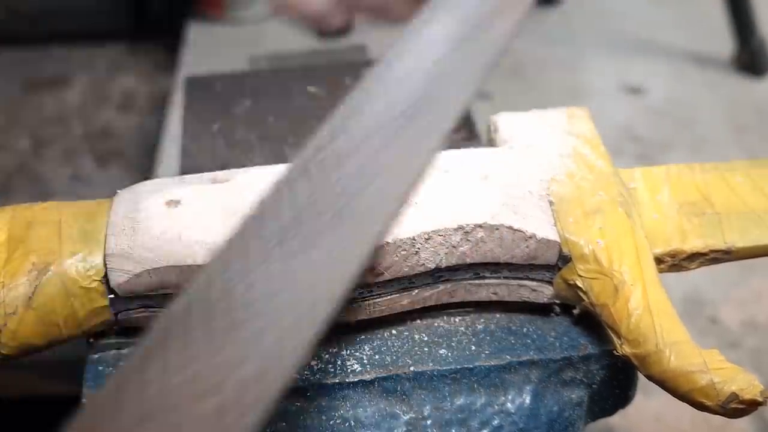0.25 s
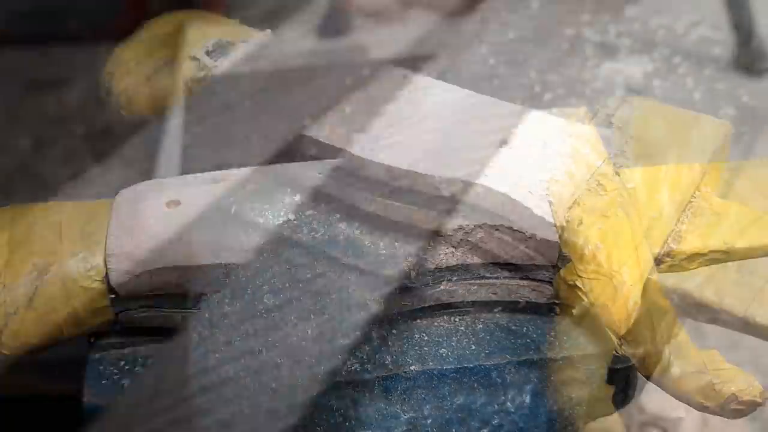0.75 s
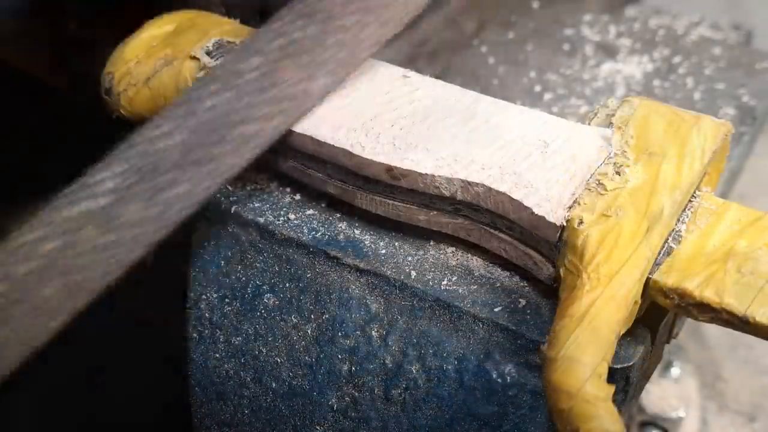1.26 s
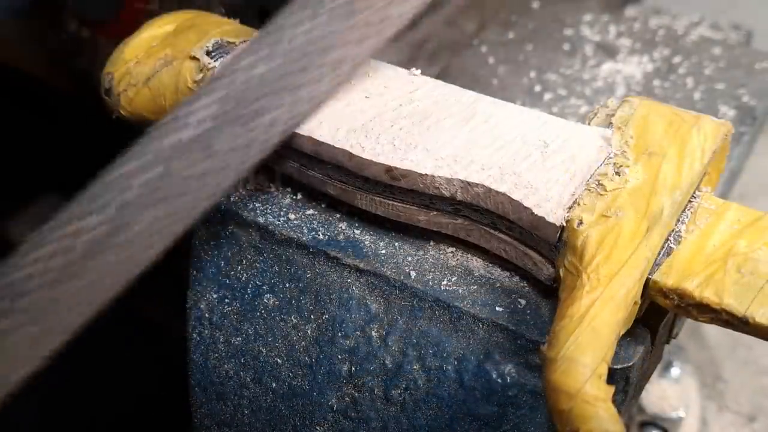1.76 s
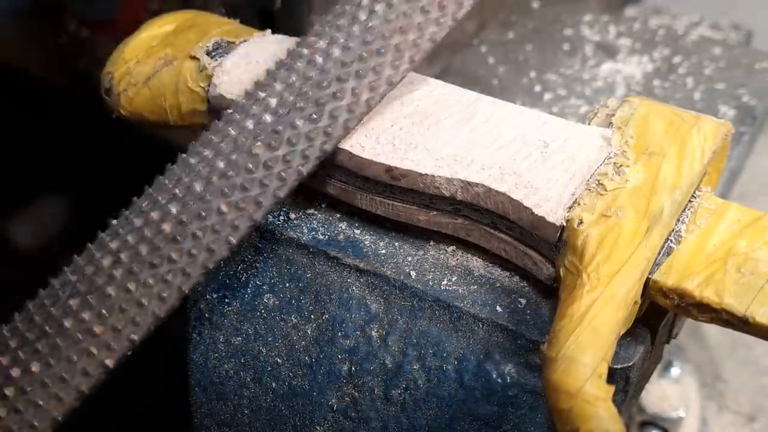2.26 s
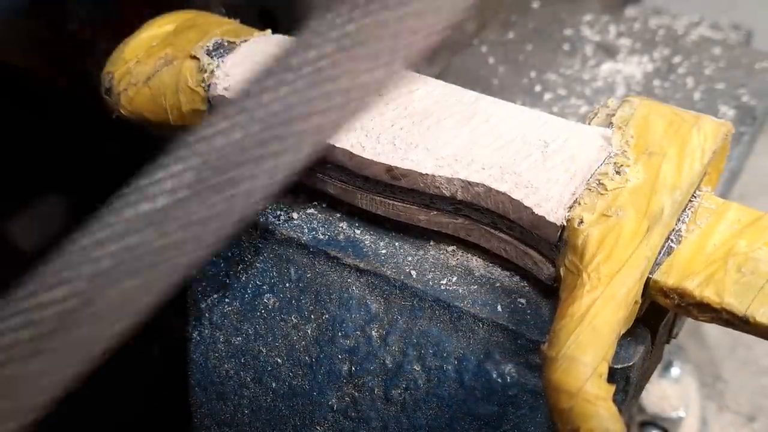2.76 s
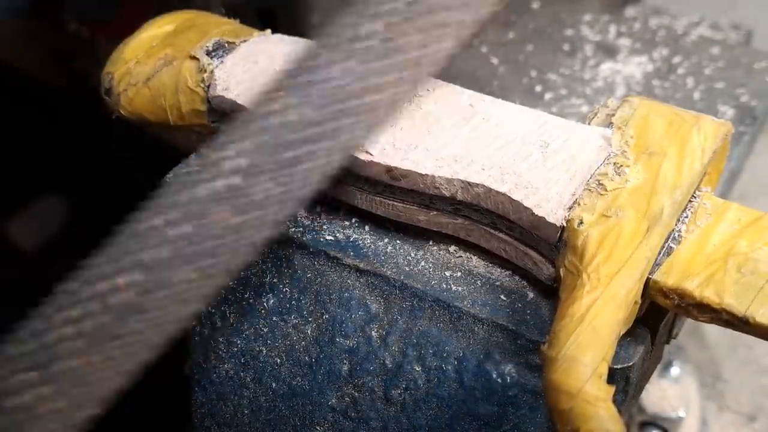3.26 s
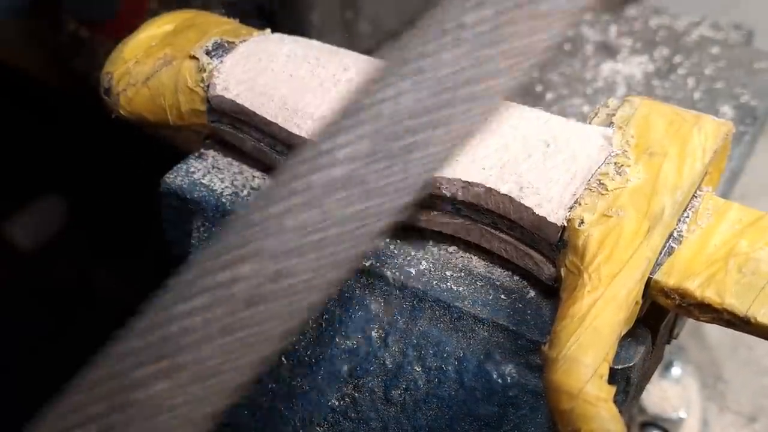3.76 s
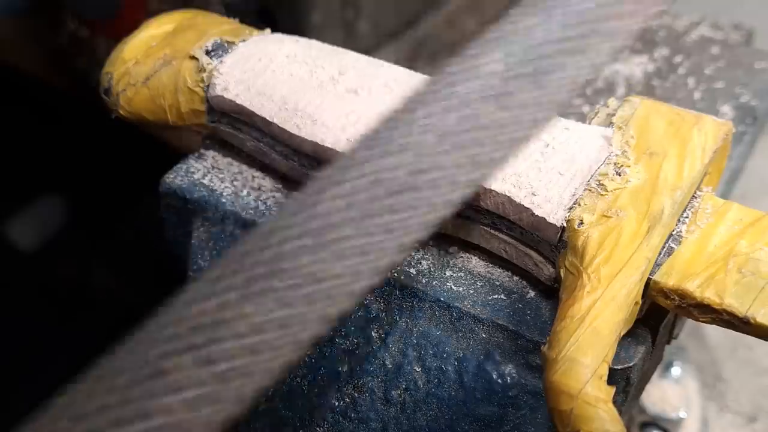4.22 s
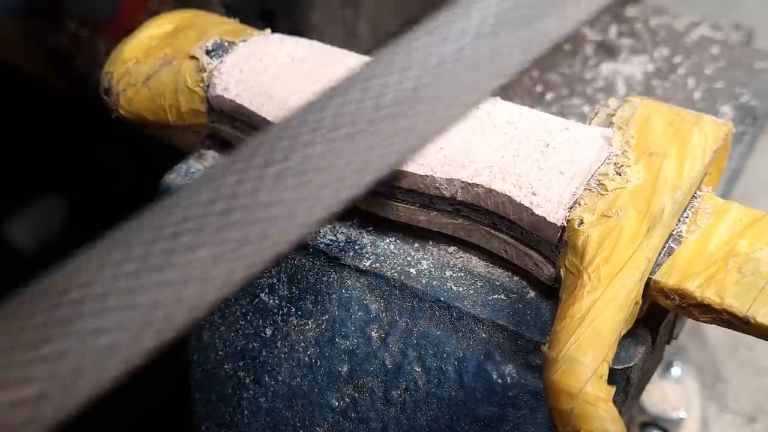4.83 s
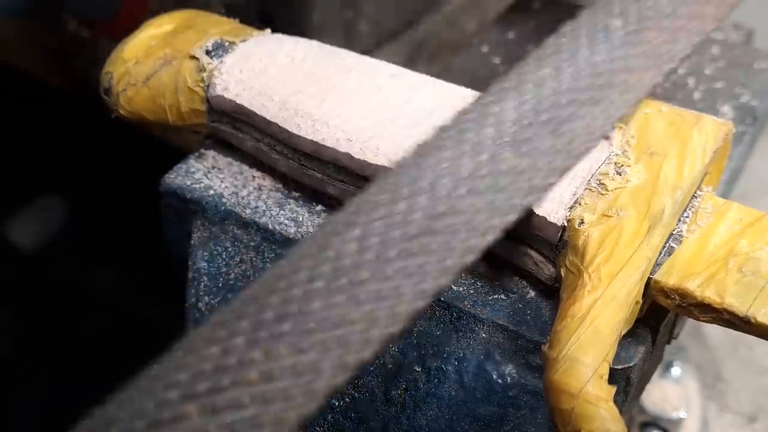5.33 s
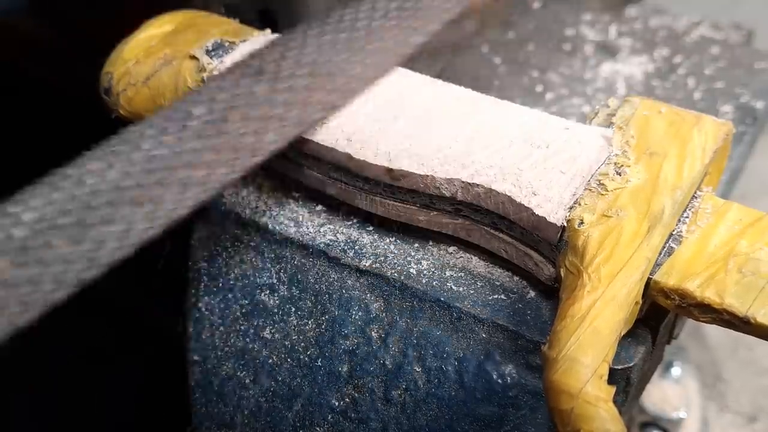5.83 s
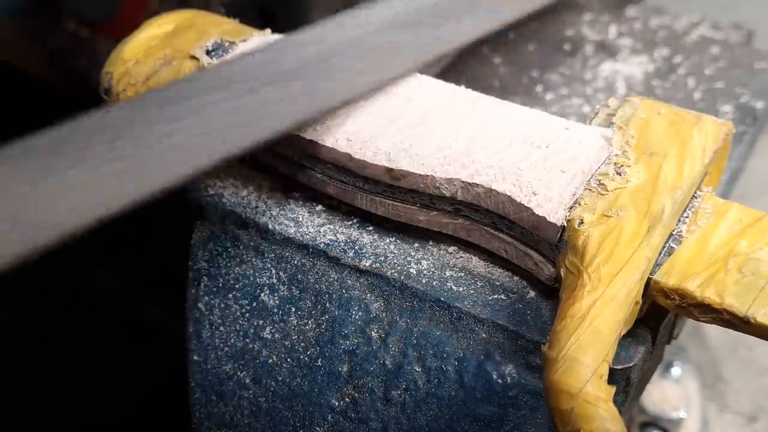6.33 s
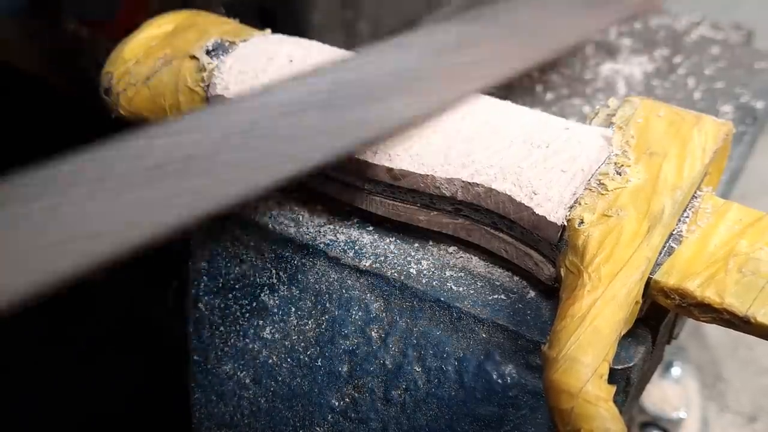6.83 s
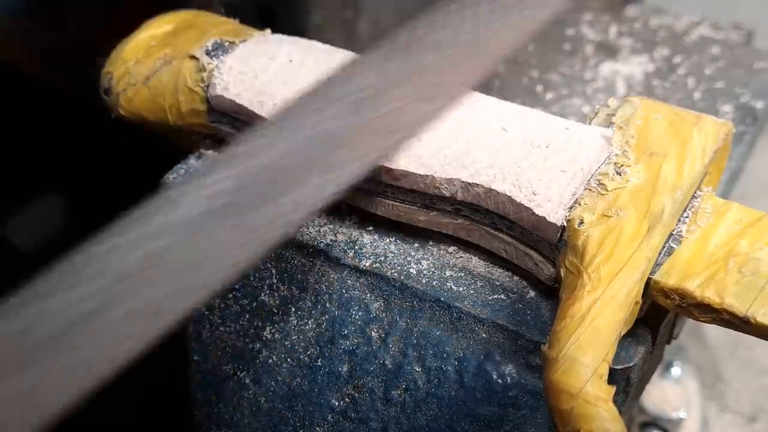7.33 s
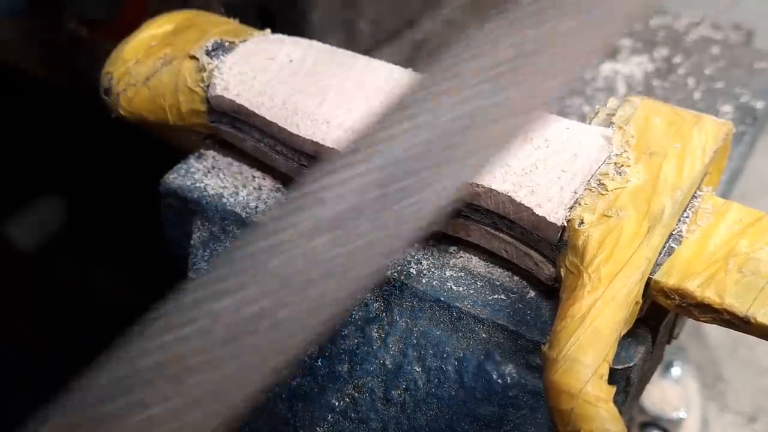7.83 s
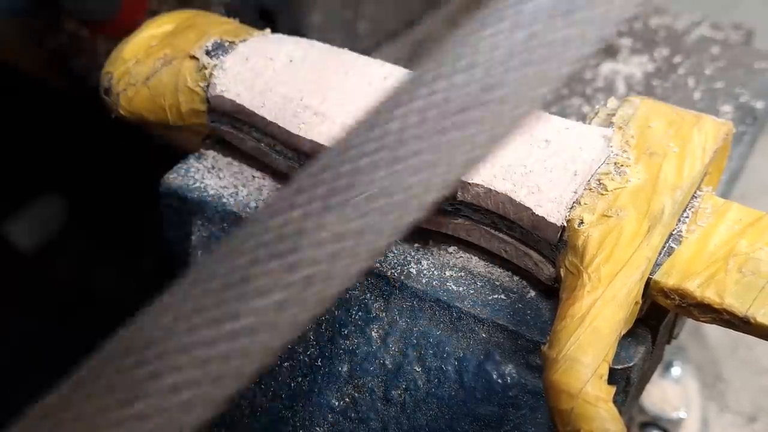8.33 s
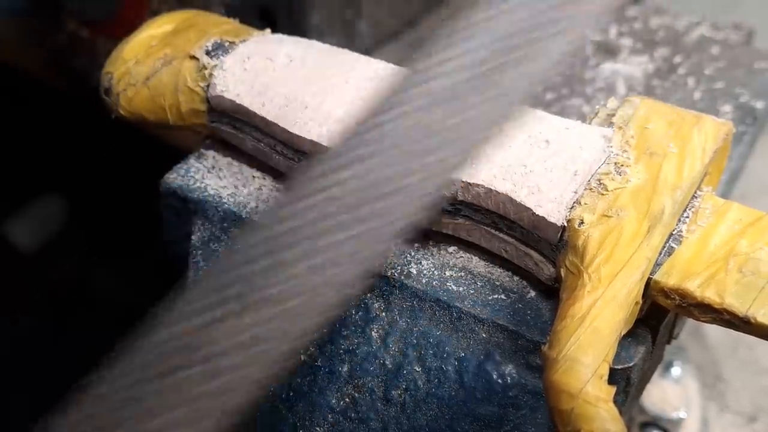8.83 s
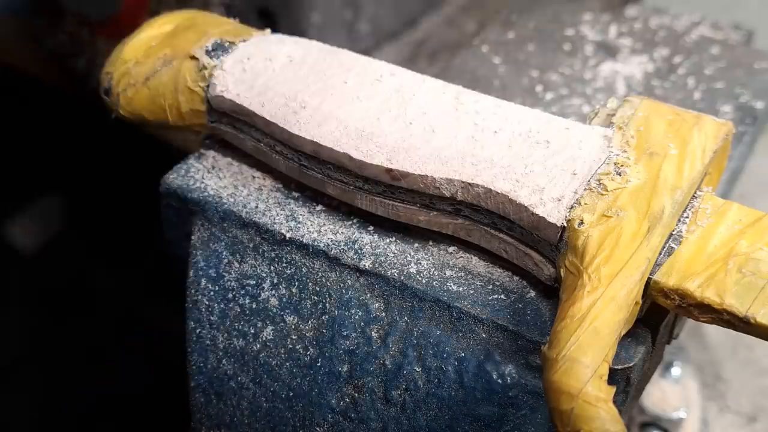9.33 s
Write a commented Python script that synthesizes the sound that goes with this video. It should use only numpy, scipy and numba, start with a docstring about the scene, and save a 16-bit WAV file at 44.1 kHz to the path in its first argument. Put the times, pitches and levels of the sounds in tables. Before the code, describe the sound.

Close up in a quiet workshop, a hand rasp works a piece of wood held in a bench vise. It starts with several scattered scrapes, then runs in brisk, even strokes that ease to a slower pace in the second half. Each push bites with a dry, grainy rasp and a slight low shudder, and each return skates back brightly. Light ticks sound now and then as the teeth land or snag.

```python
"""Rasping a wooden knife handle

A coarse hand rasp shapes a handle clamped in a bench vise, heard close up in a quiet workshop.
On each push the teeth bite, tear fibres and shake the clamp and vise; on each return they skate back.
The tooth impacts excite a bright resonance that slides as the contact moves along the rasp's blade.
Handle, clamp and vise filter every scrape, and heavy pushes rock the vise on its bench."""
import sys
import numpy as np
from scipy import signal
from scipy.fft import rfft, irfft
from scipy.io import wavfile
from scipy.ndimage import uniform_filter1d
from numba import njit

SR = 44100
rng = np.random.default_rng(int(sys.argv[2]) if len(sys.argv) > 2 else 0)


def to_wav(sig):
    """Store sig (one row per channel, or 1-D mono) as 16-bit WAV at the path in sys.argv[1].

    Samples outside -1..1 are clipped; the rate is SR.
    """
    pcm = np.clip(np.atleast_2d(sig), -1, 1) * 32767
    pcm = np.round(pcm).astype(np.int16)
    wavfile.write(sys.argv[1], SR, pcm.T)  # frames by channels


N = 422478
TIME = np.arange(N) / SR
FREQ = np.arange(2 ** 18 + 1) * SR / 2 ** 19


def undb(db):
    """Amplitude ratio of a level in decibels."""
    return 10 ** (np.asarray(db) / 20)


def unit(x):
    """Normalisation to an rms of 1."""
    return x / np.sqrt(np.mean(x ** 2))


def steady(x, size):
    """Division by the running rms over size samples leaves only the fine grain."""
    return x / np.sqrt(uniform_filter1d(x ** 2, size) + 1e-12)


def colour(points):
    """Minimum-phase response through (f/Hz, level/dB) points, by folding the cepstrum."""
    hz, db = np.transpose(points)
    gain = undb(np.interp(np.log(FREQ + 1), np.log(hz), db))
    cepstrum = irfft(np.log(gain))
    cepstrum[1:len(FREQ) - 1] *= 2
    cepstrum[len(FREQ):] = 0
    return np.exp(rfft(cepstrum))


def through(x, response):
    """Filtering by multiplication of spectra; white noise keeps its power."""
    filtered = irfft(rfft(x, 2 * (len(FREQ) - 1)) * response)[:N]
    return filtered / np.sqrt(np.mean(np.abs(response) ** 2))


@njit
def bandpass(x, hz, q):
    """Second-order state-variable resonator whose centre may move every sample."""
    y, band, low = np.empty(len(x)), 0., 0.
    for i in range(len(x)):
        g = np.tan(np.pi * hz[i] / SR)
        v = (band + g * (x[i] - low)) / (1 + g * (g + 1 / q))
        band, low, y[i] = 2 * v - band, low + 2 * g * v, v / q
    return y


def stroke(start, end):
    """The samples of a stroke and its progress from 0 to 1."""
    span = slice(int(start * SR), int(end * SR))
    return span, np.linspace(0, 1, span.stop - span.start)


def arch(progress, peak, rise, fall):
    """Skewed half-sine envelope; the exponents rise and fall sharpen its flanks."""
    warped = progress * (1 - peak) / (progress * (1 - peak) + peak * (1 - progress))
    return np.abs(np.sin(np.pi * warped)) ** np.where(progress < peak, rise, fall)


def hold(progress, attack_s, release_s, ease_db):
    """Envelope with an attack, a slow exponential decline and a linear release."""
    age = progress * len(progress) / SR
    rise = np.minimum(age / attack_s, 1)
    fall = np.minimum((age[-1] - age) / release_s, 1)
    return np.sin(np.pi / 2 * rise) ** 2 * fall * undb(ease_db * progress)


def bumps(events, half_width_s):
    """Superposed Gaussian envelopes, one for each (t/s, level/dB)."""
    return sum(undb(db) * np.exp(-((TIME - s) / half_width_s) ** 2) for s, db in events)


# spectrum of the room noise: f/Hz, level/dB
ROOM_SPECTRUM = [(20, -2.5), (45, -12.5), (120, 0), (400, -14.5), (1500, -25.5), (3600, -21.5), (5400, -33),
                 (10000, -31.5)]
# envelope of a dull rumble: t/s, level/dB
RUMBLE_LEVEL = [(.1, -90), (.33, -70), (.38, -58), (.51, -64), (.58, -80), (.7, -110)]
def workshop(room_db=-79):
    """Spectrally shaped noise gives a faint background and one short, dull rumble."""
    air = through(rng.standard_normal(N), colour(ROOM_SPECTRUM))
    dull = colour([(20, -8), (60, -4), (150, 1), (300, -18), (1000, -53.5)])
    rumble = through(rng.standard_normal(N), dull)
    return undb(room_db) * air + undb(np.interp(TIME, *np.transpose(RUMBLE_LEVEL))) * rumble


# back strokes: start t/s, end t/s, ring level/dB, tearing level/dB, fall in pitch/fraction
BACK_STROKES = [(0.132, 0.159, -41, -52, -0.071), (0.788, 0.873, -37.5, -53.5, 0.2),
                (0.92, 0.998, -35.5, -41, -0.28), (1.265, 1.307, -22, -42, 0.14),
                (1.42, 1.51, -46, -49.5, 0.0015), (1.623, 1.701, -25.5, -44.5, 0.17),
                (1.808, 1.878, -33.5, -56, 0.39), (1.998, 2.049, -25.5, -46, 0.17),
                (2.188, 2.245, -57, -59, 0.031), (2.351, 2.427, -27, -47.5, 0.2),
                (2.531, 2.609, -32.5, -43, 0.29), (2.754, 2.793, -20.5, -56.5, 0.13),
                (2.924, 3.001, -22, -39, 0.26), (3.136, 3.211, -22, -46.5, 0.28),
                (3.377, 3.407, -10, -79, -0.15), (3.561, 3.619, -19, -46, -0.12),
                (3.743, 3.812, -22, -42, -0.05), (3.925, 3.996, -23.5, -48.5, 0.13),
                (4.114, 4.199, -22, -47.5, 0.1), (4.316, 4.402, -25.5, -48, 0.12),
                (4.513, 4.597, -26, -57.5, 0.22), (4.705, 4.787, -27, -53.5, 0.34),
                (4.906, 5.02, -27, -64.5, 0.38), (5.177, 5.311, -26.5, -65.5, -0.23),
                (5.464, 5.592, -26.5, -64.5, -0.03), (5.78, 5.914, -27, -62, 0.19),
                (6.073, 6.206, -31.5, -61, 0.38), (6.424, 6.497, -26.5, -44.5, 0.22),
                (6.678, 6.824, -29, -56, 0.11), (7.014, 7.17, -31, -58, 0.04),
                (7.332, 7.482, -30, -71, 0.12), (7.741, 7.825, -26.5, -49.5, 0),
                (8.023, 8.18, -28.5, -62, 0.04), (8.403, 8.534, -28, -67, 0.04),
                (8.715, 8.834, -23.5, -60.5, 0.04), (9.029, 9.146, -26.5, -67, -0.06)]
def returns(light_hz, hiss_db=-15):
    """Sliding friction under light load: the teeth skate back with mostly ring and little drag."""
    for start, end, ring_db, tear_db, sag in BACK_STROKES:
        span, progress = stroke(start, end)
        ring = undb(ring_db) * hold(progress, attack_s=.052, release_s=.055, ease_db=-3.5)
        drag = undb(tear_db) * arch(progress, peak=.76, rise=.86, fall=.91)
        hz = light_hz[span] * (1 + sag * (.5 - progress))
        yield span, progress, hz, [ring, drag, drag, undb(hiss_db) * ring]


def teeth(grain, catches_per_s=420, unevenness=.51, scatter_db=4, crack_s=.0018, rub=.35):
    """Impulsive excitation: rows of teeth catch and crack, adding in power to the rub of the rest."""
    gap, size = rng.standard_normal((N // 40, 2)).T
    onsets = (np.cumsum(np.exp(unevenness * gap)) * SR / catches_per_s).astype(int)
    catches = np.bincount(onsets, undb(scatter_db * np.clip(size, -2, 2)), N)[:N]
    cracks = unit(signal.lfilter([1], [1, -np.exp(-1 / (crack_s * SR))], catches))
    cracks = 2 * np.tanh(cracks / 2)  # fibres give way before a catch grows too strong
    return np.sqrt((grain * cracks) ** 2 + rub ** 2 * (1 - grain ** 2) + .02)


def skipping(grain, skips_per_s=110, depth_db=3.5):
    """Amplitude modulation: a lightly held blade skips, so its bite comes in clumps."""
    lifts = np.clip(rng.standard_normal(N // 100), -2, 1)
    return undb(depth_db * grain * np.interp(TIME * skips_per_s, np.arange(len(lifts)), lifts))


def end_reflections(x, hz, near_cycles=3, near_db=-11, far_cycles=8, far_db=-10):
    """Comb filtering: waves return from both ends of the rasp; the ripple slides with the ring."""
    now = np.arange(N)
    period = SR / uniform_filter1d(hz, size=400)
    near = np.interp(np.round(now - near_cycles * period), now, x)
    far = np.interp(np.round(now - far_cycles * period), now, x)
    return x + undb(near_db) * near + undb(far_db) * far


def blade(x, hz, q):
    """Resonance of the blade on the wood, steep-sided from three resonators in cascade."""
    for _ in range(3):
        x = bandpass(x, hz, q)
    return x


# judder relative to the shudder, as the rasp works round the edge: t/s, level/dB
JUDDER_LEVEL = [(1.5, -15.5), (3, -12), (4.4, -5), (5.2, -8), (6.3, -3.5), (7.3, -3.5), (8.4, -1.5),
                (9, -8.5)]
def judder(progress, fast_hz=280, slow_hz=215, wobble=.06006):
    """Periodic forcing: tooth rows bump over the wood's edge, fastest and hardest in mid-stroke."""
    swell = arch(progress, peak=.56, rise=3, fall=2.5)
    drift = unit(uniform_filter1d(rng.standard_normal(N), size=400))
    hz = (slow_hz + (fast_hz - slow_hz) * swell) * (1 + wobble * drift)
    phase = 2 * np.pi * np.cumsum(hz) / SR
    gain = undb(np.interp(TIME, *np.transpose(JUDDER_LEVEL)))
    return gain * swell * (np.sin(phase) + .37 * np.sin(2 * phase))


# spectra of tearing fibres, shuddering clamp and vise, and friction hiss: f/Hz, level/dB
TEAR_SPECTRUM = [(60, -35), (120, -14), (260, -2), (650, 1.5), (1100, 7), (1700, -2.5), (2500, -3),
                 (4500, -20), (7000, -17.5), (9500, -28.5)]
SHUDDER_SPECTRUM = [(45, -40.5), (68, -32.5), (90, -1.5), (135, -9.5), (200, 6), (290, -3), (420, -6),
                    (650, -13), (1000, -12.5), (2000, -48.5)]
HISS_SPECTRUM = [(400, -39.5), (1000, -11), (2500, -2), (4500, 0), (5500, 2.5), (6700, -7), (8200, -15),
                 (9600, -26.5), (10500, -13.5)]
def rasp(shudder_db=-7):
    """Source and filter: tooth catches ring the blade, tear fibres and hiss; drag shakes the vise."""
    (ring, tear, shudder, hiss), hz, grain, progress = hand_motion()
    ringing, tearing, dragging, hissing = teeth(grain) * rng.standard_normal((4, N))
    contact = skipping(grain)
    ringing = steady(blade(end_reflections(ringing, hz), hz, q=1.69), size=600)
    hissing = steady(end_reflections(hissing, hz), size=600)
    out = ring * contact * ringing
    out += through(tear * steady(tearing, size=700), colour(TEAR_SPECTRUM))
    out += undb(shudder_db) * through(shudder * steady(dragging, size=700), colour(SHUDDER_SPECTRUM))
    out += shudder * judder(progress)
    return out + through(hiss * contact * hissing, colour(HISS_SPECTRUM))


# blade resonance under a light touch, moving as the rasp works round the edge: t/s, f/Hz
LIGHT_PITCH = [(.6, 3960), (.8, 2955), (2.6, 2762), (3.15, 2913), (3.6, 3260), (4.3, 3550), (5.0, 3340),
               (5.5, 3464), (6.1, 3060), (6.4, 2836), (7.2, 3058), (9.1, 2941)]
# the rasp lands or a tooth snags: t/s, level/dB, 60 dB decay time/s
IMPACTS = [(.134, -32, 0.055), (.514, -41.5, 0.011), (.6, -33.5, 0.16), (1.013, -35, 0.01),
           (1.046, -27.5, 0.14), (2.82, -18.5, 0.049), (3.107, -30, 0.019), (3.185, -21.5, .014),
           (3.58, -25.5, 0.014), (3.596, -16.5, 0.006), (3.656, -13.5, 0.027), (4.021, -27, 0.048),
           (6.09, -31, .04), (6.429, -18.5, 0.071), (6.452, -37, 0.03), (6.75, -19.5, 0.013),
           (6.888, -19.5, .014), (7.08, -19, 0.034), (7.755, -17.5, .05)]
def taps(wood_db=-14):
    """Impact of steel on wood: an exponentially decaying rattle rings the blade and knocks the handle."""
    ring, knock = np.zeros((2, N))
    age = TIME[:SR // 5]
    for s, db, t60 in IMPACTS:
        rattle = rng.standard_normal(len(age)) * undb(-60 * age / t60)
        tone = blade(rattle, np.interp(s + age, *np.transpose(LIGHT_PITCH)), q=2.5)
        span = slice(int(s * SR), int(s * SR) + len(age))
        ring[span] += undb(db) * tone / np.abs(tone).max()
        knock[span] += undb(db) * rattle / np.abs(rattle).max()
    return ring + undb(wood_db) * through(knock, colour(TEAR_SPECTRUM))


# forward strokes: start t/s, end t/s, ring level/dB, tearing level/dB, shudder level/dB,
# ring f/Hz at full pressure
FORWARD_STROKES = [(0.178, 0.363, -31.5, -31.5, -34, 4730), (0.618, 0.797, -36.5, -37, -38, 4180),
                   (1.024, 1.224, -56, -45.5, -45.5, 4330), (1.313, 1.418, -32.5, -35, -33.5, 2920),
                   (1.526, 1.613, -26, -33.5, -35, 2980), (1.72, 1.79, -24, -37, -31, 2916),
                   (1.91, 1.968, -31.5, -38, -33, 2970), (2.249, 2.349, -31.5, -38, -31, 2802),
                   (2.446, 2.525, -24, -34, -30, 3085), (2.806, 2.907, -27, -30.5, -20, 3570),
                   (3.007, 3.105, -25.0, -32.0, -24.5, 3455), (3.222, 3.303, -22.5, -30, -31, 3580),
                   (3.422, 3.527, -26.5, -28.5, -23.5, 3660), (3.635, 3.725, -22.5, -33.5, -25, 3340),
                   (3.834, 3.906, -20, -38, -31.5, 3435), (4.015, 4.098, -25.5, -36.0, -30, 3463),
                   (4.214, 4.296, -23, -35.5, -32, 3880), (4.41, 4.496, -23.5, -38.5, -31.5, 3885),
                   (4.605, 4.688, -24.5, -47, -50.0, 3900), (4.794, 4.884, -33, -48.5, -44.5, 4820),
                   (5.041, 5.169, -38.5, -41.0, -43.5, 4310), (5.333, 5.441, -31, -37, -42, 4200.0),
                   (5.615, 5.75, -34, -42.0, -40.5, 4460), (5.926, 6.058, -34, -43.5, -41, 4716),
                   (6.232, 6.363, -31.5, -42, -35.5, 3237), (6.521, 6.656, -32, -38, -34, 4068),
                   (6.851, 6.989, -36.5, -39.5, -33, 4750), (7.179, 7.318, -39.5, -44, -38, 4600.0),
                   (7.505, 7.651, -26, -34, -32.5, 3700.0), (7.842, 8.002, -25, -35.0, -29, 3175),
                   (8.208, 8.371, -29.5, -36, -30, 3250.0), (8.552, 8.683, -25.5, -34, -31, 3200.0),
                   (8.855, 8.991, -26.5, -36, -32.5, 3330), (9.167, 9.288, -26, -37.5, -36.5, 3250.0)]
def pushes(light_hz, skate_s=.04, bite_s=.0083, damping_db_per_octave=11, sag=.13):
    """Contact loading: the rasp skates until the teeth sink in, which raises the ring and damps it."""
    for start, end, ring_db, tear_db, shudder_db, full_hz in FORWARD_STROKES:
        span, progress = stroke(start, end)
        length_s = len(progress) / SR
        pressure = arch(progress, peak=.53, rise=1.85, fall=.45)
        speed = arch(progress, peak=.47, rise=2.05, fall=1)
        sunk = 1 / (1 + np.exp((skate_s - progress * length_s) / bite_s))
        hz = light_hz[span] + sunk * (full_hz - light_hz[span])
        ring = undb(ring_db + damping_db_per_octave * np.log2(full_hz / hz))
        ring *= hold(progress, attack_s=.053, release_s=.043, ease_db=-1.6)
        hz *= 1 - sag * progress ** 3  # the pitch sinks as the push runs out
        # louder, higher and longer strokes hiss more than the usual push (-27 dB, 3500 Hz, 0.11 s)
        hiss_db = -35 + .44 * (ring_db + 27)
        hiss_db += 8.5 * np.log2(full_hz / 3500) + 5.5 * np.log2(length_s / .11)
        tear, shudder = undb(tear_db) * pressure, undb(shudder_db) * pressure
        yield span, progress, hz, [ring, tear, shudder, undb(hiss_db) * speed]


# spectrum of the bench's lowest resonance: f/Hz, level/dB
BENCH_SPECTRUM = [(45, -39.5), (65, -25), (80, 1.5), (100, 1.5), (125, -6.5), (170, -5.5), (300, -49)]
# a heavy push rocks the vise on its bench: t/s, level/dB
VISE_ROCKS = [(1.37, -43.5), (1.56, -47), (1.94, -51), (2.308, -41), (3.26, -42.5), (3.69, -48),
              (5.12, -58), (5.39, -57.5), (5.7, -51), (9.221, -54)]
def thumps():
    """Forced vibration: the bench's lowest resonance swells and dies under heavy pushes."""
    boom = steady(through(rng.standard_normal(N), colour(BENCH_SPECTRUM)), size=2000)
    return boom * bumps(VISE_ROCKS, half_width_s=.052)


# the teeth dig in as a return slows down: t/s, level/dB
TOOTH_DIGS = [(1.495, -47.5), (1.865, -41), (2.41, -45), (5.895, -56.5), (6.18, -43.5), (7.135, -48),
              (8.175, -60.5), (8.52, -58)]
def digs(shudder_db=7):
    """Transient drag: digging teeth briefly add to the envelopes of tearing and shudder."""
    return np.outer([0, 1, undb(shudder_db), 0], bumps(TOOTH_DIGS, half_width_s=.011))


def hand_motion(return_grain=.74, push_grain=.48, turn_db=-22, uneven_db=.5):
    """Reciprocating motion sets the envelopes, the ring's pitch, the graininess and stroke progress."""
    envelopes = np.zeros((4, N))  # ring, tearing, shudder, hiss
    grain, progress = np.zeros((2, N))
    light_hz = np.interp(TIME, *np.transpose(LIGHT_PITCH))
    hz = light_hz.copy()
    for strokes, graininess in (returns(light_hz), return_grain), (pushes(light_hz), push_grain):
        for span, done, pitch, drive in strokes:
            envelopes[:, span] += drive
            hz[span], grain[span], progress[span] = pitch, graininess, done
    envelopes += digs()
    # the rasp keeps rubbing faintly while the hands turn round
    envelopes += undb(turn_db) * uniform_filter1d(envelopes, size=2600, axis=1)
    # harder and softer wood passes under the teeth
    hardness = unit(uniform_filter1d(rng.standard_normal(N), size=700))
    return envelopes * undb(uneven_db * hardness), hz, grain, progress


# resonances (+) and antiresonances (-) of handle, clamp and vise: f/Hz, nominal width/Hz, level/dB
HANDLE_MODES = [(98, 39, 5.5), (166, 12, 9), (217.5, 5.3, 4.5), (249, 25, 9.5), (365.2, 20, 6.5),
                (424, 39, -1.5), (462, 40, 9), (592.6, 12, 6), (733, 111, 7.5), (834, 43, -11),
                (941, 19, -24), (1170, 12, 0.5), (1360, 34, 5.5), (1663, 70, -5), (1672, 37, 10),
                (2107, 140, 8), (2726, 650, 5), (3570, 97, 3.5), (4080, 790, 4.5), (5380, 240, 2.5),
                (5810, 150, 2.5), (6694, 280, 6.5), (8060, 960, 9), (9100, 200, 6), (9430, 510, 11)]
def clamped_handle(x, max_q=36):
    """Modal filtering: the damped modes of handle, clamp and vise impose peaks and dips."""
    response = 1
    for hz, width, db in HANDLE_MODES:
        stiffness = hz ** 2 - FREQ ** 2
        loss = 1j * FREQ * max(width, hz / max_q)
        response = response * (stiffness + undb(db) * loss) / (stiffness + loss)
    return through(x, response)


def bench(x, scatter_db=-13, scatter_t60=.067, boom_db=-29, boom_t60=.31, boom_hz=450):
    """Reverberation: bench and vise scatter a brief tail in which low frequencies decay more slowly."""
    age = TIME[:SR // 2]
    scatter = rng.standard_normal(len(age)) * undb(-60 * age / scatter_t60)
    boom = rng.standard_normal(len(age)) * undb(-60 * age / boom_t60)
    boom = signal.sosfilt(signal.butter(2, boom_hz, fs=SR, output="sos"), boom)
    tail = undb(scatter_db) * scatter / np.linalg.norm(scatter)
    tail += undb(boom_db) * boom / np.linalg.norm(boom)
    return x + signal.fftconvolve(x, tail)[:N]


def scene():
    """Superposition of the rasping, the bench and the room, alike in both channels."""
    work = clamped_handle(rasp() + taps())
    return np.tile(bench(work) + thumps() + workshop(), (2, 1))


def record(dry, cutoff_hz=10200):
    """A steep low-pass filter removes the highest treble."""
    return signal.sosfilt(signal.cheby1(12, .2, cutoff_hz, fs=SR, output="sos"), dry)


dry = scene()
out = record(dry)
to_wav(out)
```